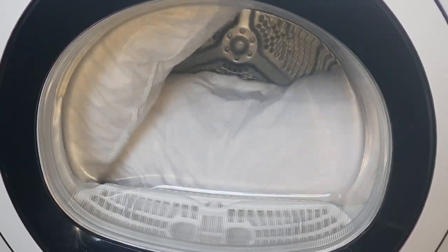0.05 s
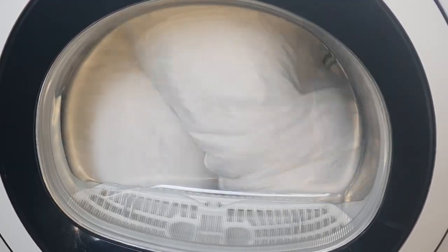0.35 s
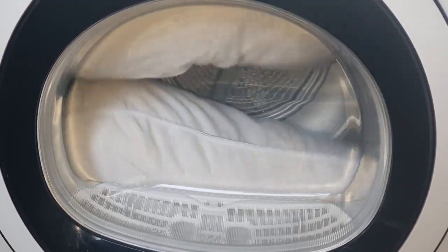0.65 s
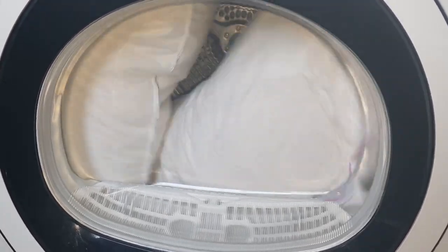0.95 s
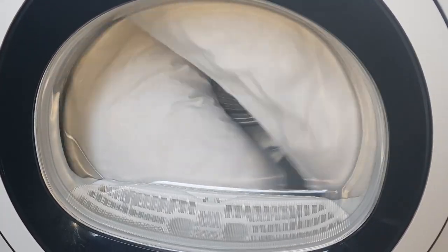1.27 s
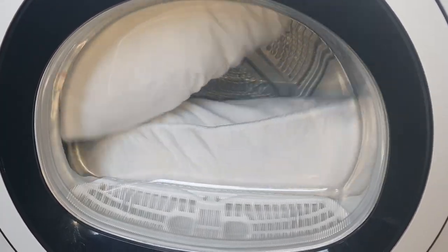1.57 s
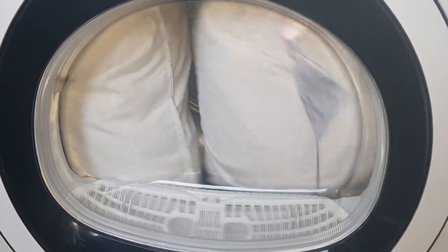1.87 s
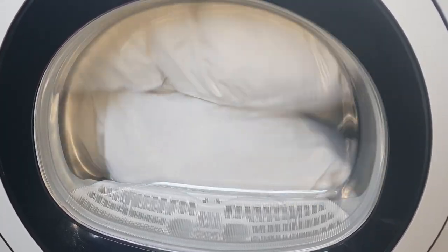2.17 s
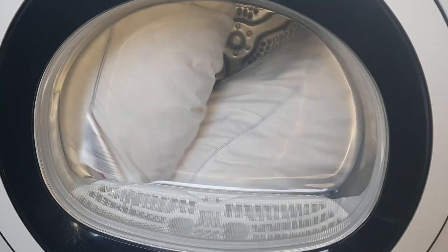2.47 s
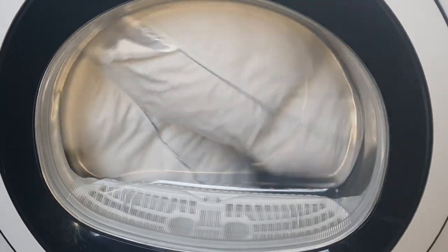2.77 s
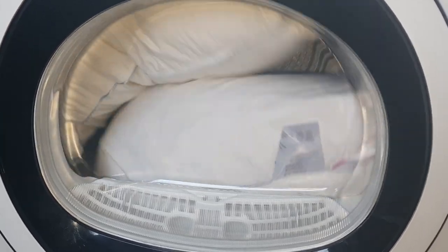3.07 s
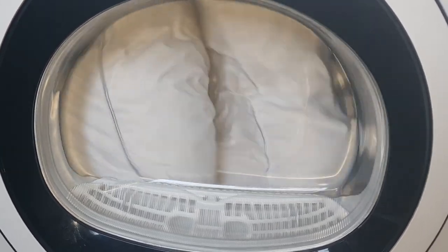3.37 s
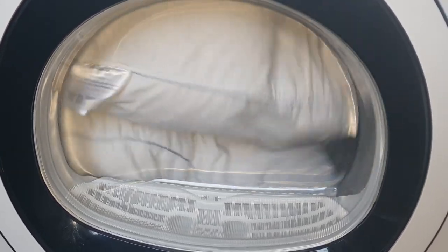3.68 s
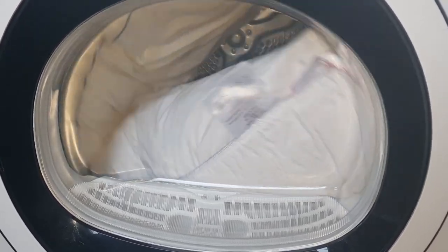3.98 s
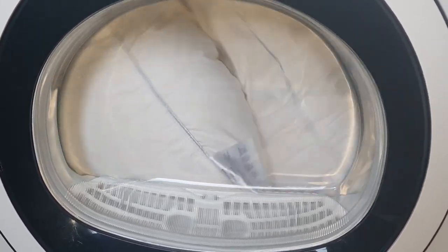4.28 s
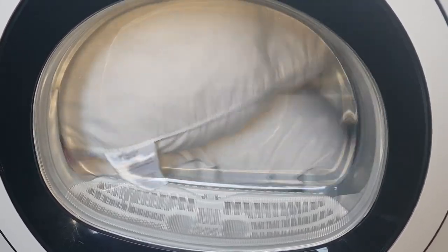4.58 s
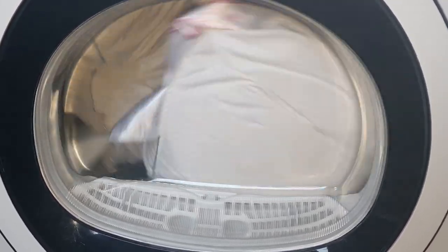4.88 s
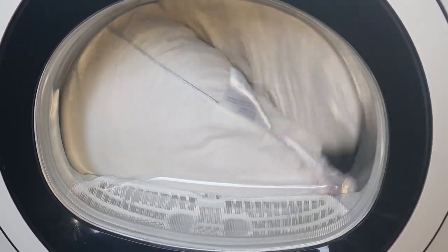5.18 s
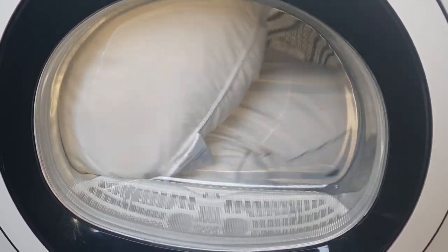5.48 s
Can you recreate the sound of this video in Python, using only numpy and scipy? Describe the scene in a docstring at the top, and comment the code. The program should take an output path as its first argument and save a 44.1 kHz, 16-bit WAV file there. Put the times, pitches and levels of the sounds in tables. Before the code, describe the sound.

Close to the door of a tumble dryer in a small room, a low motor hum throbs gently throughout, joined by the rumbling drum, the rush and whine of the blower and a thin buzz. The load of pillows lands with several soft thuds and cloth brushes early on, then roughly every second. Late on, the whine and hum rise for a moment before a final brush against the door.

```python
"""A heat-pump tumble dryer turns a load of pillows in a small room, heard close to its door.
From the start the motor hums at twice the mains frequency and beats three times a second against the
buzzing compressor; the cabinet rocks, the drum booms, and the blower rushes and whines.
Pillows thump in the drum and brush the door in the first half second, then about once a second.
Near 5 s the whine flares and the hum swells; one last brush follows."""
import sys
import numpy as np
from scipy.fft import rfft, irfft, next_fast_len
from scipy.io import wavfile
from scipy.ndimage import uniform_filter1d, map_coordinates

SR = 44100
rng = np.random.default_rng(int(sys.argv[2]) if len(sys.argv) > 2 else 0)


def generate_wav(signal):
    """Clip the signal to [-1, 1] and save it as 16-bit WAV at the path in sys.argv[1]."""
    frames = np.transpose(np.atleast_2d(signal))
    scaled = np.clip(frames, -1, 1) * 32767
    pcm = np.round(scaled).astype(np.int16)
    wavfile.write(sys.argv[1], SR, pcm)


N = 248724
T = np.arange(N) / SR
HUM_HZ, STROKE_HZ, DRUM_MOTOR_HZ, BLOWER_HZ = 100.26, 48.582, 46.5, 47.097
TOGETHER_S = .28  # a moment when drum motor and compressor push in phase


def amp(db):
    """Amplitude ratio of a level in decibels."""
    return 10 ** (np.asarray(db) / 20)


def unit(x):
    """Normalisation to rms 1."""
    return x / np.sqrt(np.mean(x ** 2) + 1e-20)


def along(points, hz):
    """Interpolation of (f/Hz, value) points on a logarithmic frequency axis."""
    f, v = np.transpose(points)
    return np.interp(np.log(hz + 1), np.log(f + 1), v)


def wobble(rate):
    """Slow random modulation: a spline through rate Gaussian knots a second."""
    return map_coordinates(rng.standard_normal(int(N * rate / SR) + 4), [T * rate])


def filtered(x, response):
    """Linear filtering: the spectrum of x times a frequency response."""
    size = next_fast_len(N + SR // 4)
    return irfft(rfft(x, size) * response(np.fft.rfftfreq(size, 1 / SR)), size)[..., :N]


def slope(points):
    """Spectral envelope through (f/Hz, level/dB) points."""
    return lambda hz: amp(along(points, hz))


def resonances(modes):
    """Power sum of steep-sided resonances (f/Hz, width/Hz, level/dB)."""
    return lambda hz: np.sqrt(sum((amp(db) / (1 + (2 * (hz - centre) / width) ** 2)) ** 2
                                  for centre, width, db in modes))


def rush(colour, correlation=None):
    """Partly coherent stereo noise of rms 1: the ratio of mid to side sets the correlation."""
    # sound field of the room: f/Hz, left-right correlation
    room_correlation = [(100, 0.16), (200, 0.86), (400, 0.97), (700, 0.79), (1200, 0.13), (1700, -0.31),
                        (2400, 0.31), (5000, -0.09)]
    # balance: f/Hz, left minus right level/dB
    balance = [(100, -2.5), (200, -2.5), (380, 0), (1600, 0.5), (2400, -3.5), (3900, 0), (5200, -3),
               (6800, -1), (8500, -3.5), (15000, -1.5)]

    def mid_and_side(hz):
        angle = np.arccos(np.clip(along(correlation or room_correlation, hz), -1, 1)) / 2
        return colour(hz) * np.array([np.cos(angle), np.sin(angle)])

    mid, side = filtered(rng.standard_normal((2, N)), mid_and_side)
    stereo = np.array([mid + side, mid - side])
    return unit(filtered(stereo, lambda hz: amp(np.outer([.5, -.5], along(balance, hz)))))


def tones(rows, base_hz, drift_hz):
    """Harmonics of a drifting rate; standing waves in the room shift their phase between the sides."""
    # phase difference: f/Hz, lag of the left side/rad
    lags = [(280, 0), (850, .8), (1130, 2.0), (1410, 1.5), (2770, 1.2), (2820, 2.2), (2866, 2.9),
            (2915, 1.6), (2965, 1.2), (3110, 1.2), (3210, 2.2), (3935, .9), (4660, 1.2), (5300, 2.3)]
    turns = np.cumsum(base_hz + drift_hz * wobble(2.96)) / SR
    out = np.zeros((2, N))
    for order, left_db, right_db in rows:
        phase = rng.uniform(0, 2 * np.pi) + np.array([[0], [along(lags, order * base_hz)]])
        out += np.sqrt(2) * amp([[left_db], [right_db]]) * np.sin(2 * np.pi * order * turns + phase)
    return out


def steady(x, seconds):
    """Division by the running rms evens out slow swells and keeps the quick flutter."""
    power = uniform_filter1d(np.mean(x ** 2, axis=0), int(seconds * SR))
    return x / np.sqrt(np.abs(power) + 1e-9)


def contacts(rows):
    """Envelope of soft contacts, each rising and decaying like a critically damped pulse."""
    out = np.zeros(N)
    for onset, db, rise in rows:
        age = np.maximum(T - onset, 0) / rise
        out += amp(db) * age * np.exp(1 - age)
    return out


def walls(x, strength, count=14):
    """Comb filtering: weak early reflections off nearby walls ripple the spectrum."""
    out = x.copy()
    for side in range(2):
        delays_s = rng.uniform(.003, .03, count)
        for delay, gain in zip(delays_s, rng.choice([-strength, strength], count)):
            out[side] += gain * np.roll(x[side], int(delay * SR))
    return unit(out)


def slip(in_step_s):
    """Beat phase: the hum gains about three cycles a second on twice the stroke rate."""
    return 2 * np.pi * (HUM_HZ - 2 * STROKE_HZ) * (T - in_step_s)


def shell_orders(count=115, floor_db=-76):
    """Forced vibration: each stroke harmonic is as loud as the shell responds at its frequency."""
    # compressor shell modes: f/Hz, width/Hz, left level/dB, right level/dB
    shell = np.array([(2889, 130, -55.5, -52), (3175, 170, -72, -62.5), (3768, 220, -66, -74),
                      (3930, 60, -59, -63.5), (4350, 110, -71.5, -70.5), (4654, 110, -64.5, -67),
                      (5000, 130, -72.5, -72), (5330, 44, -72, -65)])
    order = np.arange(1, count)
    responses = [resonances(np.c_[shell[:, :2], db]) for db in shell[:, 2:].T]
    left_db, right_db = (20 * np.log10(response(order * STROKE_HZ)) for response in responses)
    return np.c_[order, left_db, right_db][np.maximum(left_db, right_db) > floor_db]


def compressor():
    """Amplitude modulation: the shell's buzz throbs at the slip rate and the refrigerant hiss flickers."""
    # hiss bands of the refrigerant lines: f/Hz, width/Hz, relative level/dB
    pipes = [(8520, 2600, -2.5), (10570, 720, -2), (11700, 190, 0.5), (12320, 600, 1.5), (13280, 250, -7)]
    throb_db = np.array([[.6], [3.1]]) * np.cos(slip(in_step_s=.22)) + .5 * wobble(18)
    buzz = tones(shell_orders(), STROKE_HZ, drift_hz=0.011) * amp(throb_db)
    flicker = amp(1.3 * wobble(22))
    ripple = 1 + .12 * np.cos(2 * np.pi * STROKE_HZ * T)  # each stroke pushes the flow a little
    hiss = amp([[-67.5], [-60.5]]) * flicker * ripple * rush(resonances(pipes))
    return buzz + hiss


def cabinet():
    """Rotating unbalance: two rotors rock the cabinet, falling in and out of step twice a second."""
    drum_motor = amp(-49) * np.sin(2 * np.pi * DRUM_MOTOR_HZ * (T - TOGETHER_S))
    compressor_rotor = amp(-46) * np.sin(2 * np.pi * STROKE_HZ * (T - TOGETHER_S))
    return np.sqrt(2) * amp([[-1.3], [1.3]]) * (drum_motor + compressor_rotor)


def pillows():
    """Impact and friction: soft landings thud in the drum; cloth brushes the door with a fine grain."""
    # landings, then brushes: t/s, peak level/dB, rise time/s
    thumps = [(.06, -33.5, 0.031), (.36, -36, 0.033), (.51, -34, 0.039), (1.30, -33.5, 0.012),
              (1.46, -34, 0.015), (2.55, -32, 0.019), (2.80, -39, 0.016), (3.54, -38, 0.045),
              (4.84, -38.5, 0.035)]
    brushes = [(.068, -40.5, 0.018), (.339, -40.5, 0.007), (1.25, -51, 0.087), (2.505, -46.5, 0.022),
               (3.05, -47.5, 0.039), (3.552, -42.5, 0.023), (4.16, -51, .05), (4.804, -39, .012),
               (5.426, -42.5, 0.0072)]
    # their spectra: f/Hz, relative level/dB
    thud_spectrum = [(50, -2), (150, 4), (250, -0.5), (330, -10.5), (500, -9), (900, -41), (3000, -46.5)]
    cloth_spectrum = [(200, -6.5), (550, 3.5), (1200, 4.5), (2400, -4.5), (4500, -19), (12000, -47)]
    landing = contacts(thumps) * rush(slope(thud_spectrum))
    sliding = amp(-52 + 2 * wobble(14))  # the load never quite stops rubbing
    grain = amp(0.59 * wobble(90))
    cloth = (contacts(brushes) + sliding) * grain * rush(slope(cloth_spectrum))
    return landing + cloth


def blower():
    """Flow noise excites duct and cavity resonances; the passing blades add faint harmonics."""
    # rushing air: f/Hz, relative level/dB
    air_spectrum = [(25, -11.5), (55, 0), (300, 1.5), (560, -1.5), (780, -7), (1400, -6.5), (2000, -14),
                    (2650, -17), (3200, -12.5), (3920, -13), (4080, -17.5), (5500, -19.5), (7500, -28.5),
                    (15500, -38)]
    # duct and cavity resonances: f/Hz, width/Hz, relative level/dB
    duct_modes = [(647.3, 11.2, 1), (662.8, 22.4, -5), (630, 41, -8.5)]
    cavity_modes = [(312, 6.6, 6), (504, 67, 3), (600, 7, 6), (650, 65, 10), (1435, 28, 1)]
    # course of the duct whine: t/s, relative level/dB
    whine_levels = [(0, -41), (.8, -39), (.95, -43), (1.25, -38), (1.38, -45), (2.12, -38), (2.33, -37.5),
                    (2.52, -45), (2.65, -42.5), (3.55, -39), (4.27, -44), (4.84, -44.5), (4.94, -35),
                    (5.02, -47), (5.4, -43), (5.6, -38)]
    # blade tones: shaft order, left level/dB, right level/dB
    blades = [(6, -46.5, -50.5), (12, -58, -58), (18, -54, -62), (24, -68, -57.5), (30, -62, -75)]
    air_db = -38.5 + 0.31 * wobble(1.5) + 0.63 * wobble(8.1)
    air = amp(air_db) * walls(rush(slope(air_spectrum)), strength=0.085)
    whine_db = np.interp(T, *np.transpose(whine_levels)) + 0.5
    whine = amp(whine_db) * steady(rush(resonances(duct_modes), [(640, 0.95)]), seconds=0.16)
    cavity = amp(-48.5) * rush(resonances(cavity_modes), [(600, -0.59)])  # sides largely in antiphase
    return air + whine + cavity + tones(blades, BLOWER_HZ, drift_hz=0.018)


def drum():
    """Random excitation of modes: the rolling drum rumbles, in phase on both sides."""
    # drum and cabinet resonances: f/Hz, width/Hz, relative level/dB
    modes = [(67.7, 16, -12.5), (90.6, 15.1, -.7), (115.3, 23, -15.5), (152, 26, -16.5), (194, 24, -19),
             (228, 15.5, -19), (259.3, 18.2, -19), (456, 66, -27)]
    return amp(-28.5 + 0.5 * wobble(15)) * rush(resonances(modes), correlation=[(100, 1.0)])


def motor():
    """Interference: the magnetic hum beats with the compressor's second order.
    The hum wavers with the rocking and briefly swells or sags."""
    # hum partials: harmonic number, left level/dB, right level/dB
    partials = [(1, -19.7, -16.8), (2, -46, -49), (4, -52.5, -64), (5, -64, -53)]
    # brief swells and dips in the hum's level: t/s, level change/dB
    swells = [(.3, 2.5), (1.19, -3.5), (1.42, -1.5), (1.66, 4), (2.13, -1), (2.61, 3.5), (3.2, 1.5),
              (3.57, 0), (3.74, -3.5), (4.35, -4.5), (4.57, -6), (5.05, 4), (5.15, 2.5)]
    rock_depth_db, second_order_db, swell_s = 0.36, -17, .025
    phase = 2 * np.pi * np.cumsum(HUM_HZ + 0.043 * wobble(3.6)) / SR
    rocking_db = rock_depth_db * np.cos(2 * np.pi * (STROKE_HZ - DRUM_MOTOR_HZ) * (T - TOGETHER_S))
    swell_db = 0.4 * wobble(7.8) + sum(db * np.exp(-((T - s) / swell_s) ** 2) for s, db in swells)
    beating = np.sin(phase) + amp(second_order_db) * np.sin(phase - slip(in_step_s=.012))
    fundamental = np.sqrt(2) * np.outer(amp(partials[0][1:]), amp(rocking_db + swell_db) * beating)
    return fundamental + tones(partials[1:], HUM_HZ, drift_hz=0.091)


def scene():
    """Superposition of all sources in the running dryer."""
    return motor() + cabinet() + drum() + blower() + compressor() + pillows()


def record(dry):
    """Band limiting: an ideal low-pass filter removes the highest treble."""
    return filtered(dry, lambda hz: hz < 15740)


dry = scene()
out = record(dry)
generate_wav(out)
```